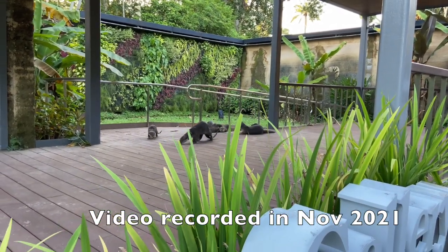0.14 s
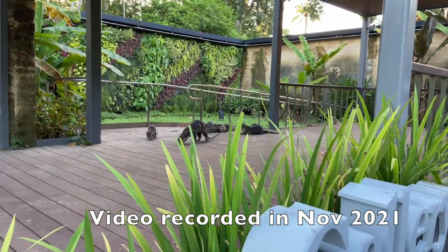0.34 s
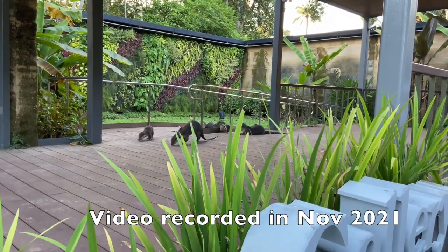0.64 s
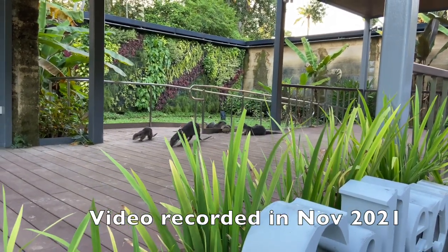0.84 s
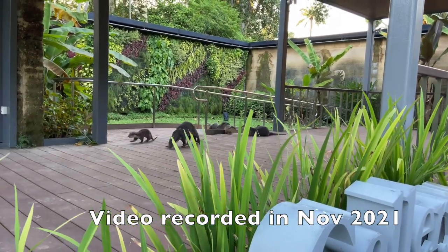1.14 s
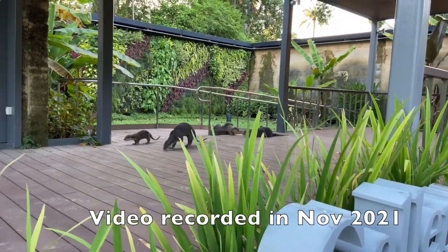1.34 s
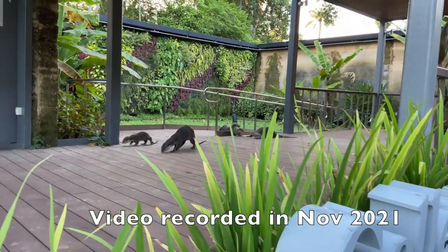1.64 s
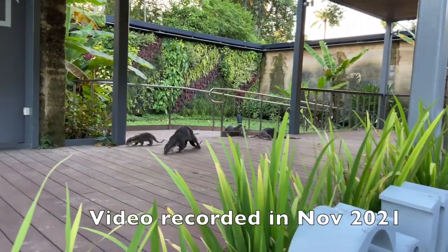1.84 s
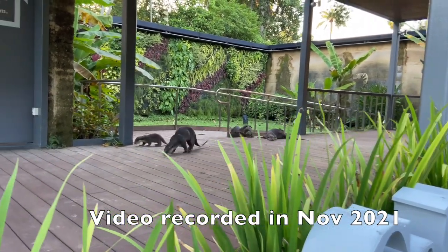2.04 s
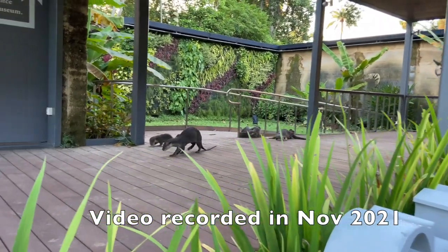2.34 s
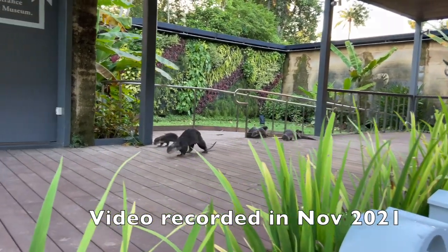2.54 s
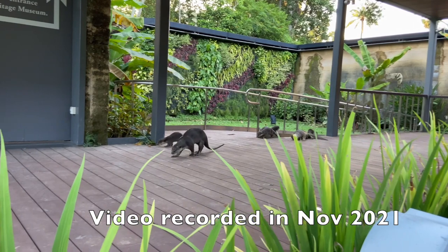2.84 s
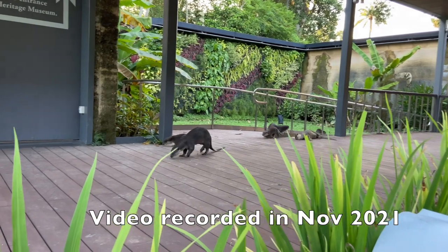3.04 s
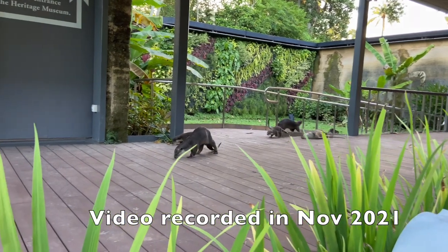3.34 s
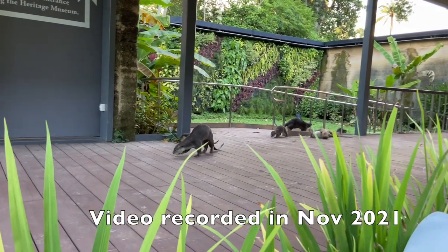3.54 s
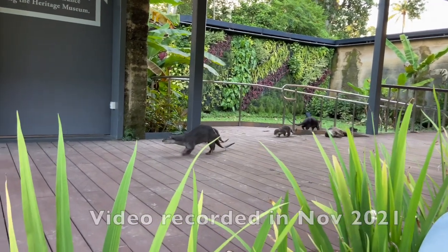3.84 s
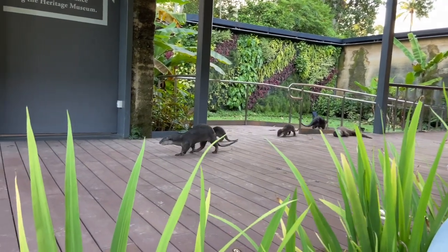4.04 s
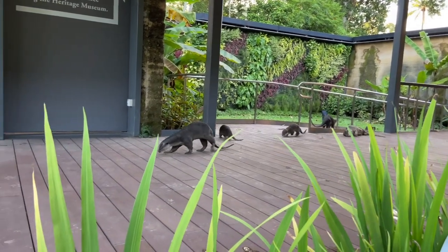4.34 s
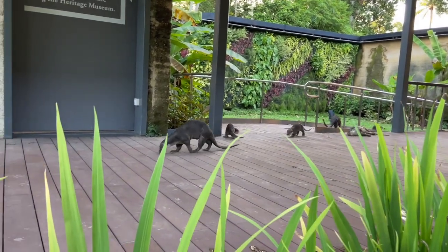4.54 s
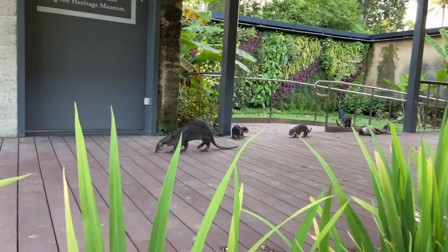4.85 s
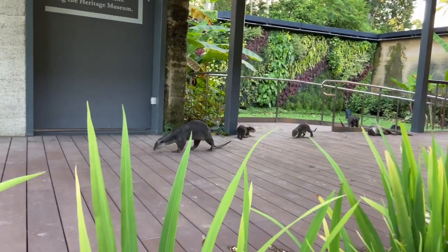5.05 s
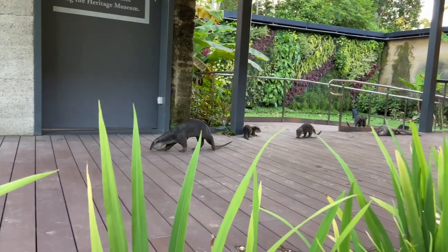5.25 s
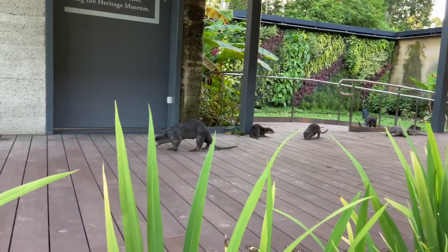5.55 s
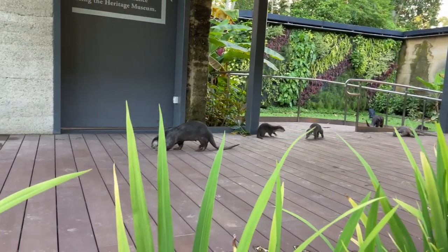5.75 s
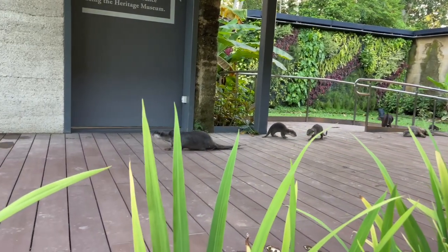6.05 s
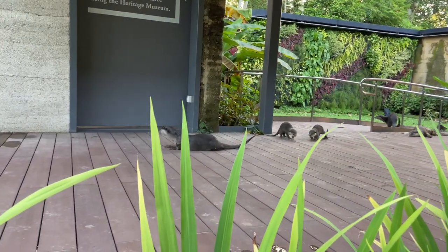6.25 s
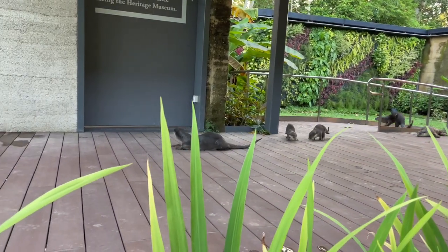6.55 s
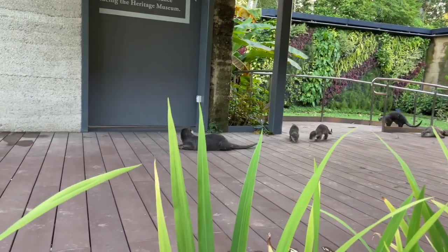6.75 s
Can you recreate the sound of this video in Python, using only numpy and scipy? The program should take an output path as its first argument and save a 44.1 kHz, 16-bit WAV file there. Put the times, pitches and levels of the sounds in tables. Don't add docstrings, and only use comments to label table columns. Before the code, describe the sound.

Otters give short, piercing falling chirps and small gulps on a roofed wooden deck, over a low steady hum and faint insect buzz.

```python
import sys
import numpy as np
from scipy import signal
from scipy.fft import rfft, irfft, next_fast_len
from scipy.io import wavfile

SR = 44100
rng = np.random.default_rng(int(sys.argv[2]) if len(sys.argv) > 2 else 0)


def undo_db(level):
    steps = np.asarray(level, float) / 20
    return 10 ** steps


def unload_wav(signal):
    wavfile.write(
        sys.argv[1],
        SR,
        np.round(np.clip(np.atleast_2d(signal).T, -1, 1) * 32767).astype(np.int16),
    )


N = 303849


def column(table, hz, index):
    rows = np.array(table)
    return np.interp(np.log(hz + 1), np.log(rows[:, 0]), rows[:, index])


def band(x, low_hz, high_hz):
    edges_hz = [low_hz, min(high_hz, .45 * SR)]
    return signal.sosfilt(signal.butter(2, edges_hz, "band", fs=SR, output="sos"), x)


def drift(rate_hz, count):
    r = np.exp(-2 * np.pi * rate_hz / SR)
    settle = 4000
    slow = signal.lfilter([1], [1, -2 * r, r * r], rng.standard_normal(count + settle))[settle:]
    return slow / slow.std()


# frequency in Hz,
# likeness from 0 to 1, left over right in dB, lead of left beyond the lag in radians.
PORTS_TREBLE = [(7200, .75, 0, 12.2), (8000, .96, 0, 12.15), (9000, .993, 0, 12.2), (11100, .985, 0, 12.56),
                (13100, .99, 0, 12.7), (15000, .995, 0, 12.4)]
PORT_LAG_S = .00027


def ports(pair, table, point_source=False):
    first, second = rfft(pair)
    hz = np.arange(len(first)) * SR / pair.shape[1]
    table = table + PORTS_TREBLE
    alike = 1 if point_source else column(table, hz, index=1)
    balance = undo_db(column(table, hz, index=2) / 2)
    lead_rad = column(table, hz, index=3) - 2 * np.pi * hz * PORT_LAG_S
    tilt = balance * np.exp(.5j * lead_rad)
    right = alike * first + np.sqrt(1 - alike ** 2) * second
    return irfft([first * tilt, right / tilt], pair.shape[1])


# frequency in Hz,
# density in dB per Hz.
AMBIENCE = [(21, -81), (32, -68.5), (41, -65), (56, -55), (85, -53.5), (93, -61.5), (104, -47), (125, -50),
            (140, -60), (185, -58.5), (215, -63), (235, -69), (280, -75), (400, -80),
            (400, -80), (600, -80.5), (900, -80.5), (1300, -86), (1800, -89), (2500, -92.5), (3300, -98),
       (4300, -102), (5500, -106), (7000, -108.5), (8000, -110.5), (9500, -112), (13000, -116),
       (14000, -121), (15500, -120)]


def background():
    size = next_fast_len(N)
    hz = np.arange(size // 2 + 1) * SR / size
    colour = undo_db(column(AMBIENCE, hz, index=1)) * np.sqrt(SR / 2) * (hz > 15)
    noise = irfft(rfft(rng.standard_normal((2, size))) * colour, size)
    return noise * undo_db(0.23 * drift(22.0, count=size))


def cicada(level_db, hz, width_hz, rate_hz, depth, size):
    unsteady_hz = rate_hz * (1 + .012 * drift(9.3, count=size))
    throb = 1 + depth * np.cos(2 * np.pi * np.cumsum(unsteady_hz) / SR)
    noise = rng.standard_normal((2, size))
    buzz = band(noise * throb ** 2, hz - width_hz / 2, hz + width_hz / 2)
    return undo_db(level_db) * buzz / buzz.std()


# time in seconds, near one in dB, far one in dB.
CICADAS = [
    (0, -67, -100),
    (.8, -68, -101),
    (1.3, -68, -75),
    (2.199, -69, -74),
    (3.1, -68.5, -71),
    (3.35, -69, -93),
    (5, -69.5, -103),
    (6.9, -69.5, -95),
]


def cicadas(size):
    s, near_db, far_db = np.transpose(CICADAS)
    t = np.arange(size) / SR
    near = cicada(np.interp(t, s, near_db), hz=11180, width_hz=920, rate_hz=110.0, depth=0.12, size=size)
    far = cicada(np.interp(t, s, far_db), hz=12300, width_hz=450, rate_hz=180., depth=.1, size=size)
    return near + far


# start in seconds, length in seconds,
# low edge in Hz, high edge in Hz, level in dB.
SCUFFS = [
    (0.343, 0.0075, 480, 675, -40),
    (.54, 0.023, 1690, 1900, -44.5),
    (1.1, 0.13, 190, 410, -40.5),
    (1.102, 0.13, 547, 820, -48),
    (1.19, 0.13, 453, 630, -42.5),
    (2.7, 0.84, 1590, 5300, -67),
    (3.462, 0.09, 287, 607, -43),
    (3.468, 0.078, 770, 940, -48),
    (5.567, 0.11, 1481, 3400, -57),
    (5.569, 0.39, 930, 1490, -50),
]
# start in seconds, length in seconds, low edge in Hz,
# high edge in Hz, level in dB.
TICKS = [
    (2.747, 0.014, 2780, 6600, -54.5),
    (2.995, 0.097, 2500, 9000, -57),
    (3.477, .008, 1500, 15000, -55),
    (4.838, 0.049, 3300, 9000, -60),
    (6.332, 0.0074, 3200, 4000, -55),
]
# start in seconds, length in
# seconds, level in dB.
HISSES = [(.02, 0.27, -81), (1.45, .14, -81), (1.985, .02, -79), (2.95, .12, -79), (4.02, .1, -82),
          (4.59, .03, -79), (5.02, .14, -84), (5.5, .1, -82), (5.85, .14, -80)]
HISS_LOW_HZ, HISS_HIGH_HZ = 13600, 15600


def scuffs(size):
    out = np.zeros((2, size))
    hisses = [(s, length, HISS_LOW_HZ, HISS_HIGH_HZ, level_db) for s, length, level_db in HISSES]
    for s, length, low_hz, high_hz, level_db in SCUFFS + TICKS + hisses:
        u = np.arange(SR // 2) / SR / length
        puff = band(rng.standard_normal((2, len(u))), low_hz, high_hz)
        envelope = np.minimum(8 * u, 1) * np.exp(-1.5 * u ** 2)
        start = round(s * SR)
        out[:, start:start + len(u)] += undo_db(level_db) * puff / puff.std() * envelope
    return out


# delay in seconds, spread in seconds, level in dB.
ECHOES = [
    (.004, 0.00094, -3),
    (0.011, .003, -2),
    (.022, .005, -15),
    (.036, .006, -11),
    (.06, .012, -16),
    (.1, .015, -18),
]
TAIL_DB, TAIL_T60_S = -8, 0.62
# frequency in Hz, likeness from 0 to 1,
# left over right in dB, lead of left beyond the lag in radians.
PORTS_NEAR = [(300, .7, -2, .5), (800, .5, -2, 1.9), (1500, .5, -2, 3.3), (2500, .5, -1, 5.3),
              (3700, .4, 1, 7.6), (5500, .4, 3, 11)]


def deck(direct, echoing):
    lead, size = 1024, SR
    t = (np.arange(size) - lead) / SR
    straight = np.tile(t == 0, (2, 1)) * 1.
    build_up = np.clip(t / 0.021 - .2, 0, 1)
    power = undo_db(TAIL_DB - 60 * t / TAIL_T60_S) ** 2 * build_up * 14 / TAIL_T60_S / SR
    for delay, spread, echo_db in ECHOES:
        cluster = np.exp(-.5 * ((t - delay) / spread) ** 2) / (2.3 * spread * SR)
        power += undo_db(echo_db) ** 2 * cluster * (t > 0)
    grains = rng.standard_normal((2, size)) * undo_db(2.84 * rng.standard_normal((2, size)) - 1.5)
    grains = band(grains, 1730, 9900) + undo_db(-2.0) * grains
    keep = size * 7 // 8
    direct_path = ports(straight, PORTS_NEAR, point_source=True)[:, :keep]
    echo_path = ports(grains * np.sqrt(power), PORTS_NEAR)[:, :keep]
    heard = signal.fftconvolve(direct, direct_path, axes=1)
    heard += signal.fftconvolve(echoing, echo_path, axes=1)
    return heard[:, lead:lead + N]


# frequency in Hz, gain in dB.
MOUTH = [(600, -0.5), (1000, -0.5), (1250, -5), (1700, -2), (2500, -7), (3300, -2.5), (4200, 0), (5200, 0),
         (7000, 2)]
HOOK_S, PLUNGE_HZ, EDGE_DB = 0.0091, 2124, 10.5
RING_HZ, RING_WIDTH_HZ, RING_DB = 6650, 250, 6.5


def call(at, row, waver, attack_s, release_s, swell_db, overtones_db, turn_db, hoarse,
         hook_hz=0, plunge=0, steepness=1):
    s, length, from_hz, to_hz, level_db = row
    t = at / SR - s
    u = np.clip(t / length, 0, 1)
    glide = from_hz + (to_hz - from_hz) * u
    hook = hook_hz * np.exp(-np.maximum(t, 0) / HOOK_S)
    pitch = glide + hook - plunge * (glide - PLUNGE_HZ) * u ** steepness
    phase = 2 * np.pi * np.cumsum(pitch * (1 + hoarse * waver[at])) / SR
    side = np.clip(turn_db, -14, 14) * np.array([[.15], [-.15]])
    tone = undo_db(side) * np.sin(phase)
    for k, db in enumerate(overtones_db, start=2):
        ring_db = RING_DB * np.exp(-((k * pitch - RING_HZ) / RING_WIDTH_HZ) ** 2)
        tone = tone + undo_db(db + ring_db) * np.sin(k * phase)
    edges = np.clip(1 - t / attack_s, 0, 2) + np.clip(1 - (length - t) / release_s, 0, 2)
    shape_db = level_db + swell_db * (u - .5) - EDGE_DB * edges
    return tone * undo_db(shape_db + column(MOUTH, pitch, index=1)), side


# start in seconds, length in seconds, pitch from in Hz, pitch to in Hz,
# level in dB. First the sliding chirps of the near animals.
SLIDES = [(.638, .082, 5120, 3810, -55.5), (2.993, 0.036, 6530, 4930, -56.5),
          (3.455, 0.094, 5250, 3730, -53)]
BOWS = [(5.142, .102, 5080, 5020, -56.5), (6.822, .13, 5330, 5250, -48.5)]
YIPS = [(3.688, 0.0396, 3230, 2610, -51)]
CRIES = [(4.326, .04, 3350, 3406, -50)]
SOBS = [(4.364, 0.0398, 3665, 3344, -45.5)]
TWEETS = [(.088, .065, 3720, 3406, -69)]
PIPS = [(4.852, 0.026, 6530, 6900, -45.5)]
DIVES = [(1.238, .084, 4600, 4250, -48), (4.033, .095, 4930, 5030, -48.5)]
GULPS = [(.733, 0.045, 1500, 1190, -41), (1.322, 0.031, 1713, 1546, -40.5), (1.34, 0.017, 1087, 1024, -38),
         (3.56, 0.029, 1810, 1060, -44), (4.122, 0.03, 1724, 1610, -50.5),
         (5.278, 0.0394, 1300, 1120, -48.5)]
CHEEPS = [(5.524, .04, 3105, 2894, -48), (5.898, 0.079, 4070, 4100, -59.5)]
PEEPS = [(1.595, .055, 5150, 3550, -71), (5.952, .045, 3850, 3680, -59), (6.02, .07, 3200, 3060, -70),
         (6.22, .1, 2840, 2770, -64)]
MEWS = [(.168, 0.069, 1330, 995, -54.5), (.455, 0.12, 1305, 1130, -59), (.535, 0.041, 945, 707, -55),
        (1.232, 0.043, 570, 533, -51), (1.595, .07, 1270, 950, -50.5), (1.635, 0.053, 622, 470, -45.5),
        (3.702, 0.02, 785, 740, -48.5)]
RISES = [(1.165, 0.078, 443, 595, -47.5), (1.232, 0.049, 698, 1203, -54), (3.625, 0.022, 681, 1015, -48.5),
         (3.648, .036, 1186, 1520, -47), (4.81, 0.018, 1283, 2140, -52.5)]
WHINES = [(5.6, .32, 520, 535, -65)]
MANNERS = [ (SLIDES, dict(hook_hz=102, plunge=0.31, steepness=5.6, attack_s=0.011, release_s=0.0086, swell_db=10, overtones_db=[-18, -37],
           turn_db=9, echo_db=-5, hoarse=0.0065)),
           (BOWS, dict(hook_hz=80, plunge=.7, steepness=2.6, attack_s=0.01, release_s=.014, swell_db=6, overtones_db=[-13, -32],
           turn_db=11, echo_db=-5, hoarse=0.0061)),
           (DIVES, dict(hook_hz=166, plunge=0.94, steepness=4.2, attack_s=.013, release_s=0.018, swell_db=6, overtones_db=[-13.5, -30],
           turn_db=15, echo_db=-4.5, hoarse=0.0064)),
           (GULPS, dict(hook_hz=340, attack_s=0.0083, release_s=0.0084, swell_db=1.5, overtones_db=[-37, -41],
           turn_db=14, echo_db=-4, hoarse=0.052)),
           (YIPS, dict(hook_hz=1010, attack_s=0.0071, release_s=0.012, swell_db=-16.5, overtones_db=[-26, -50],
           turn_db=3, echo_db=4, hoarse=.022)),
           (SOBS, dict(attack_s=.007, release_s=0.013, swell_db=-5, overtones_db=[-30, -49],
           turn_db=3, echo_db=3, hoarse=0.032)),
           (TWEETS, dict(plunge=0.33, steepness=4.0, attack_s=.018, release_s=0.011, swell_db=0, overtones_db=[-13, -30],
           turn_db=2.5, echo_db=5.5, hoarse=.015)),
           (CRIES, dict(hook_hz=841, attack_s=0.0043, release_s=.008, swell_db=-3, overtones_db=[-28.5, -50],
           turn_db=3, echo_db=6, hoarse=0.023)),
           (CHEEPS, dict(hook_hz=380, attack_s=.008, release_s=0.022, swell_db=-4, overtones_db=[-20, -34],
           turn_db=6, echo_db=-1.5, hoarse=0.011)),
           (PIPS, dict(hook_hz=250, attack_s=0.012, release_s=0.011, swell_db=-12, overtones_db=[-20, -40],
           turn_db=14, echo_db=-16, hoarse=0.014)),
           (PEEPS, dict(attack_s=.018, release_s=.018, swell_db=0, overtones_db=[-30, -34],
               turn_db=2.5, echo_db=1.5, hoarse=.012)),
               (MEWS, dict(attack_s=0.0096, release_s=0.0057, swell_db=-7, overtones_db=[-17, -19],
               turn_db=5, echo_db=-12, hoarse=0.014)),
               (RISES, dict(attack_s=0.0076, release_s=.011, swell_db=-6.5, overtones_db=[-11.5, -30],
               turn_db=11, echo_db=2, hoarse=0.037)),
               (WHINES, dict(attack_s=.1, release_s=.05, swell_db=3, overtones_db=[3.5, 6, -5, -9],
               turn_db=6, echo_db=-2, hoarse=.012)),]


def otters():
    direct, echoing = np.zeros((2, N)), np.zeros((2, N))
    waver, flutter = drift(147.0, count=N), drift(90.0, count=N)
    for rows, manner in MANNERS:
        voice = {name: value for name, value in manner.items() if name != "echo_db"}
        for row in rows:
            start, length = row[:2]
            at = np.arange(round(start * SR) - 40, round((start + length) * SR) + 100)
            fade = np.clip(np.minimum(at - at[0], at[-1] - at) / 100, 0, 1)[at < N]
            at = at[at < N]
            tone, side = call(at, row, waver, **voice)
            tone = np.sqrt(2) * tone * fade * undo_db(2.3 * flutter[at])
            direct[:, at] += tone
            echoing[:, at] += tone * undo_db(manner["echo_db"] - .5 * side)
    return direct, echoing


# frequency in Hz, likeness from 0 to 1, left over right in dB,
# lead of left beyond the lag in radians.
PORTS = [(40, .99, -1.5, 0), (150, .95, -.8, 0), (280, .75, -1.5, .1), (400, .4, -.3, .7),
         (600, .3, .3, 2.6), (900, .45, .3, 3.1), (1300, .45, -1.5, 4.8), (1800, .45, -.8, 6.4),
         (2500, .4, -.5, 5.6), (3300, .35, 0, 6.6), (4300, .5, 0, 7.3), (5500, .15, 0, 9.3)]


def scene():
    far = background()
    size = far.shape[1]
    far += cicadas(size)
    far += scuffs(size)
    return ports(far, PORTS)[:, :N] + deck(*otters())


def roll_off(x):
    return signal.sosfilt(signal.butter(12, 15700, fs=SR, output="sos"), x)


def record(dry):
    return roll_off(dry)


dry = scene()
out = record(dry)
unload_wav(out)
```